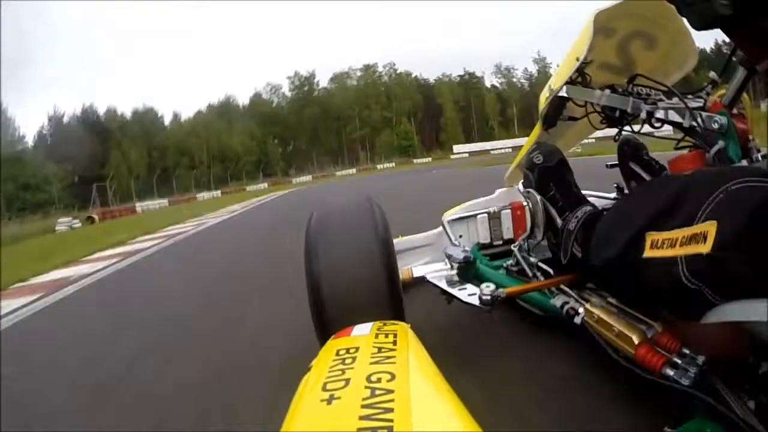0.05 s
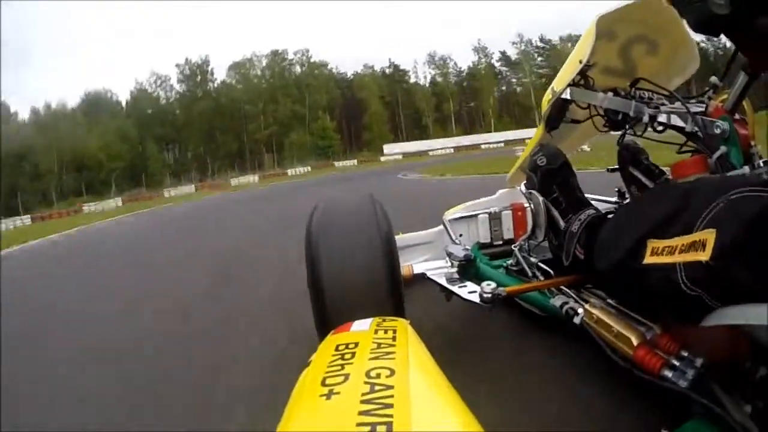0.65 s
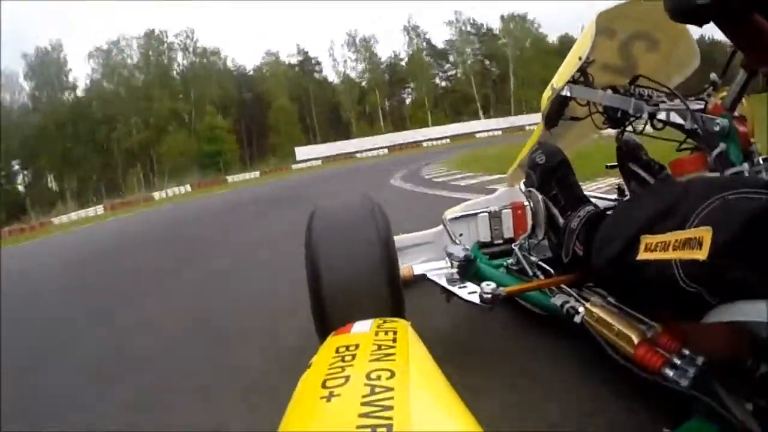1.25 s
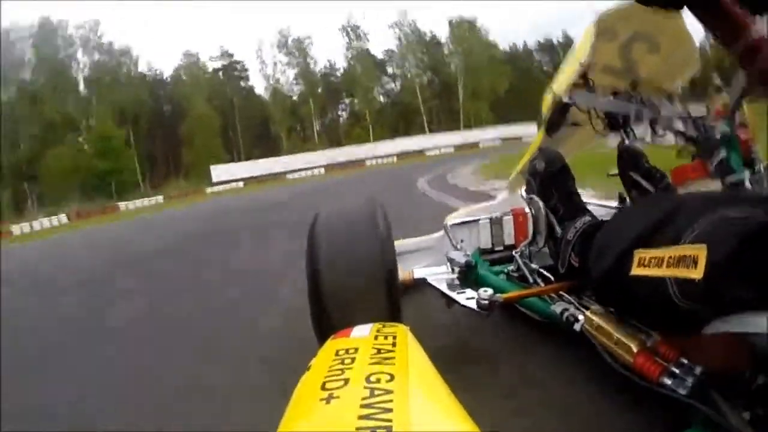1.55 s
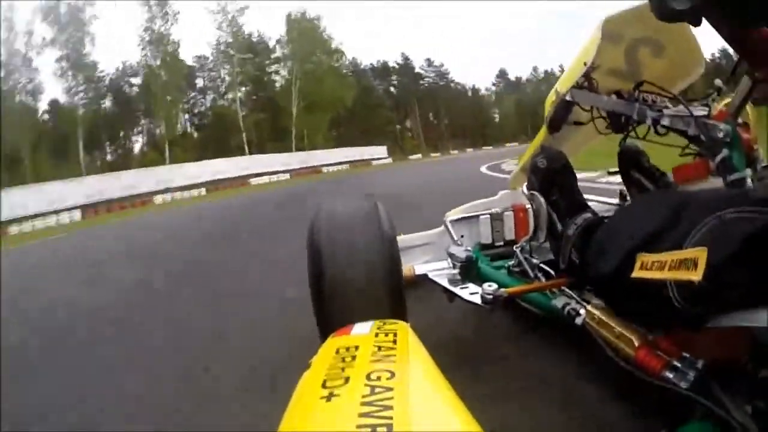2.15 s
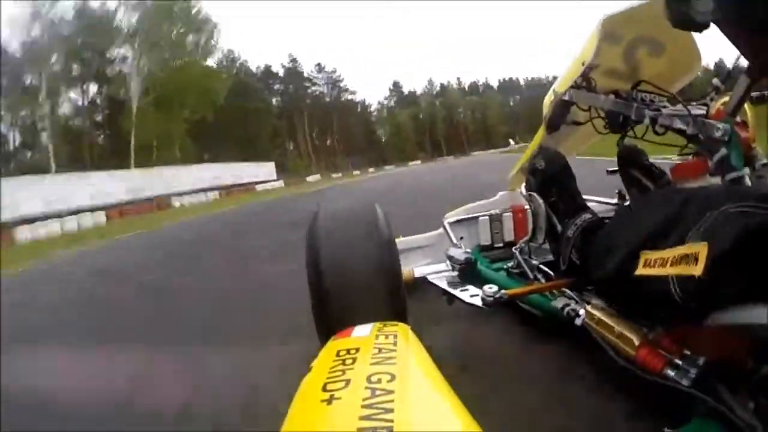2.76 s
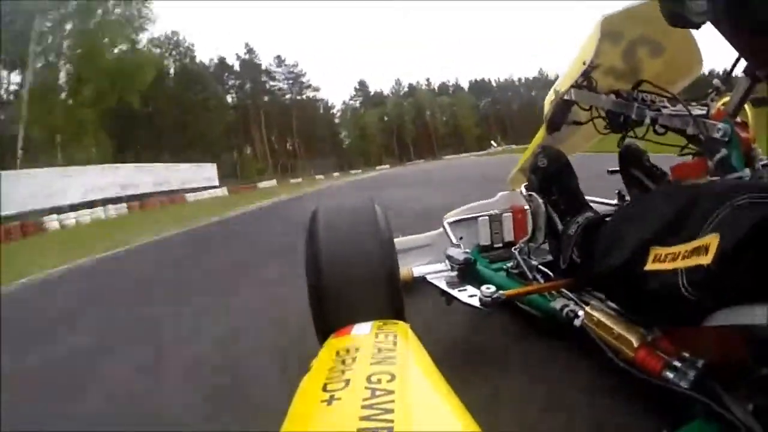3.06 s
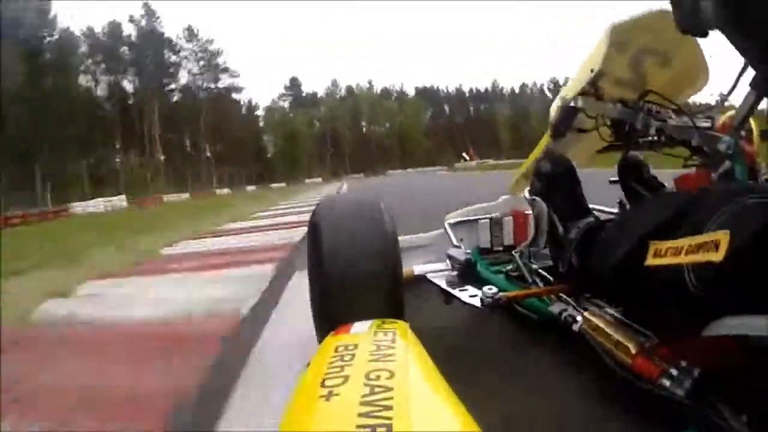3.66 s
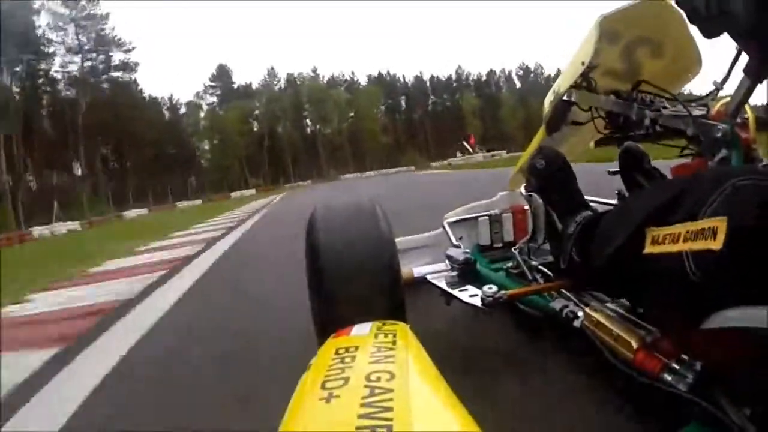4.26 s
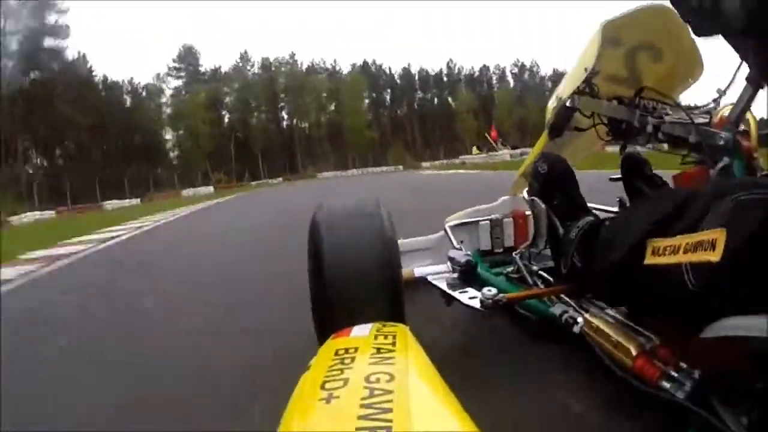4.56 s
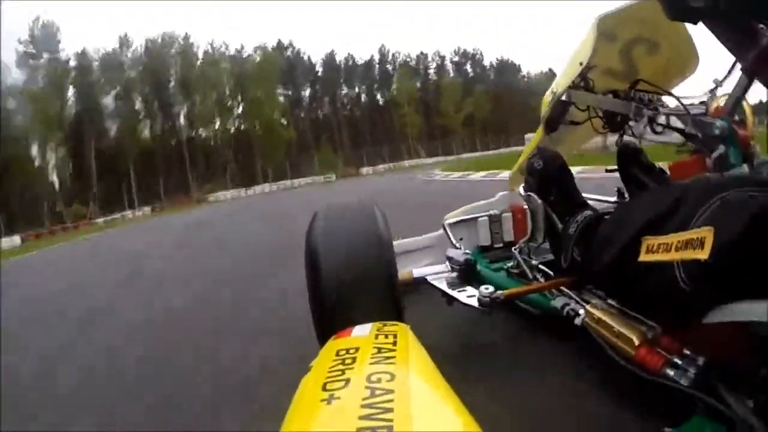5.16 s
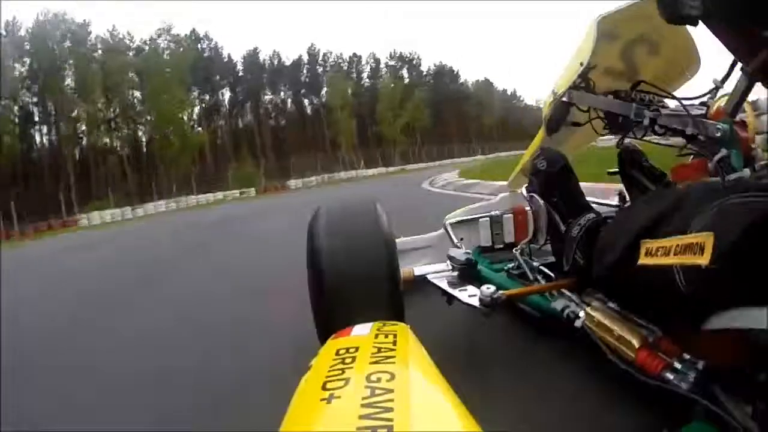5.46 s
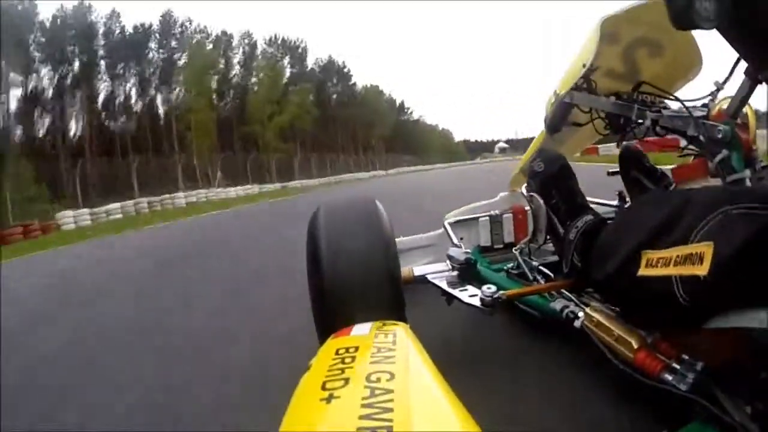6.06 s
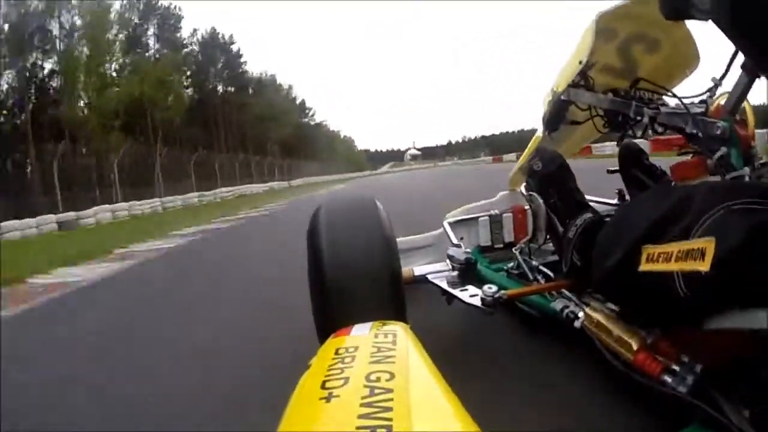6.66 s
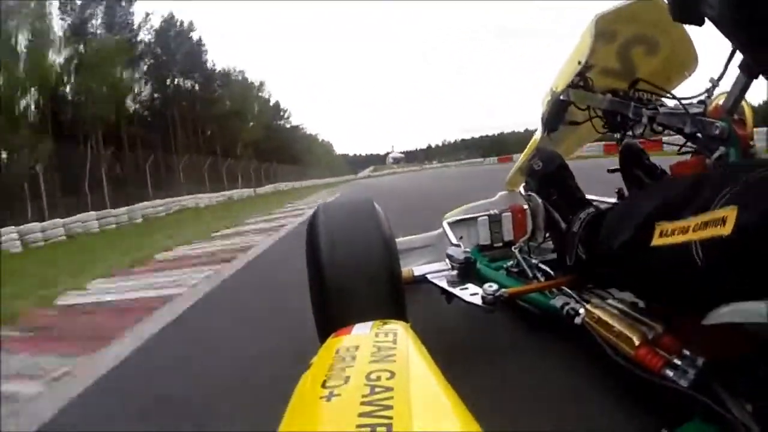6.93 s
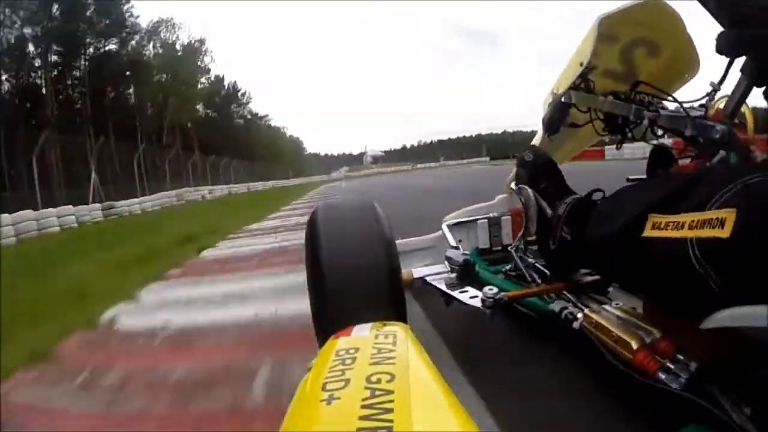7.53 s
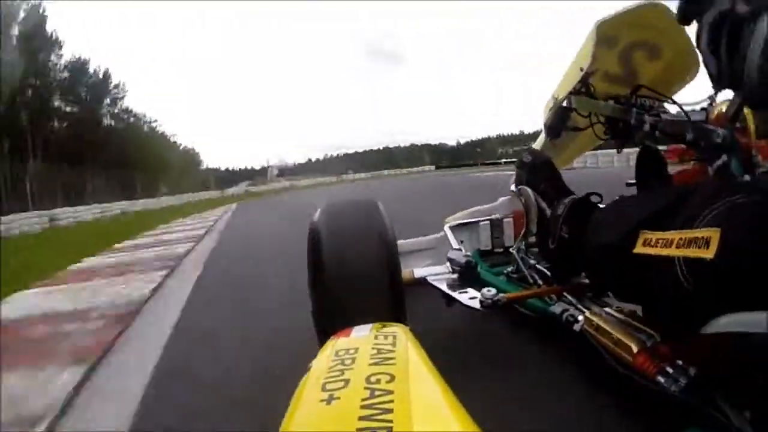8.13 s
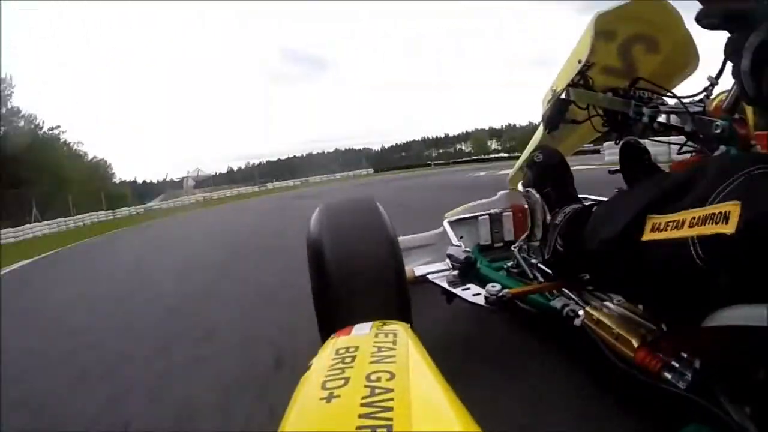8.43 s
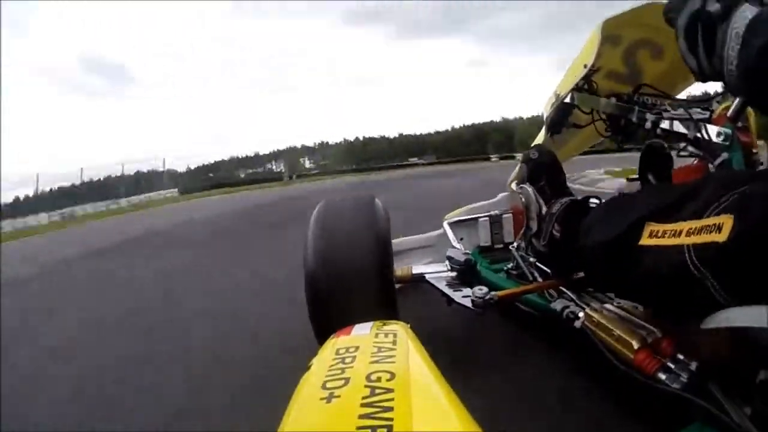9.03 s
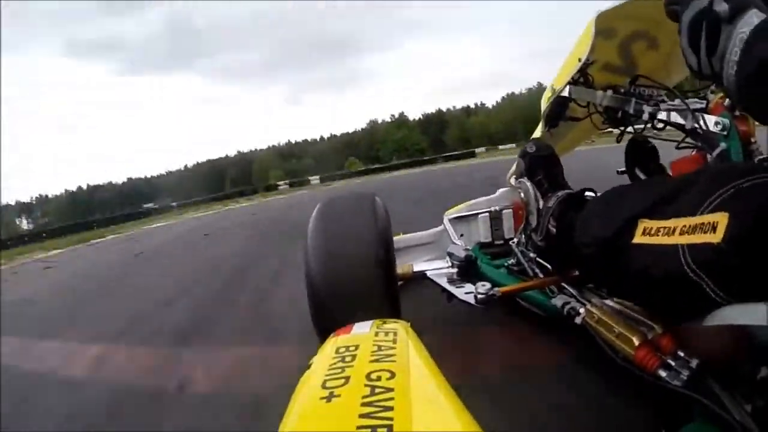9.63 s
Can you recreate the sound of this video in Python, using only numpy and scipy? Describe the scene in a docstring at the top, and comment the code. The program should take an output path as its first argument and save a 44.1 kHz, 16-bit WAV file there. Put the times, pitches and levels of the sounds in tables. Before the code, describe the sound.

A two-stroke racing kart drones near top revs on a track, heard from a microphone fixed to its side. The mount buzzes and rattles over deep chassis shudder and wind, and the kart thrums through bends and over kerbs. Late on the throttle closes, the chain whines and the pitch falls across a rough kerb. The revs pick up briefly, then sink again with another whine.

```python
"""A two-stroke racing kart, heard from a camera bolted to its side pod. From the start the engine drones
through the frame near top revs and sets the mount buzzing and rattling, over chassis shudder and wind.
The frame thrums in a bend at 1.5 s, on a kerb at 3.5 s and in a second bend at 5.5 s. At 7.5 s the
throttle closes: the chain whines and the revs sag across a rougher kerb. They pick up briefly at 8.5 s,
then the chain whines again and the engine sinks away into a last bend."""
import sys
import numpy as np
from scipy import signal
from scipy.fft import rfft, irfft, next_fast_len
from scipy.io import wavfile
from scipy.ndimage import uniform_filter1d, minimum_filter1d, map_coordinates

SR = 44100
rng = np.random.default_rng(int(sys.argv[2]) if len(sys.argv) > 2 else 0)


def transcribe(u):
    """Save the signal u as a 16-bit wav file named by the first command-line argument.

    u: samples, shape (n,) or (channels, n), limited to [-1, 1]; the rate is SR.
    q: integer samples, one column per channel.
    """
    v = np.clip(np.atleast_2d(u).T, -1, 1)
    q = np.round(v * 32767).astype(np.int16)
    wavfile.write(sys.argv[1], SR, q)


N = 431738
TIME = np.arange(N) / SR

# The bright colour of a tick on the case. Each row: frequency in Hz, level in dB.
TICK_COLOUR = [(500, -16.5), (3000, -1.5), (7000, 5), (10500, -2.5), (13300, -2), (14500, -10)]


def drone(turns, first_db, second_db):
    """The piston shakes the frame once and twice a turn."""
    first = unit(crank_order(turns, 1, flutter_db=1.3, wobble=0.14, rate=40))
    second = unit(crank_order(turns, 2, flutter_db=2.5, wobble=0.33, rate=45))
    return first * undb(first_db) + second * undb(second_db)


def frame_lift_db(hz):
    """The frame's resonances swell a crank harmonic as it slides through them."""
    # Each row: centre in Hz, width in Hz, lift in dB.
    modes = [(135.2, 35.3, 12.5), (248, 31, 15.5), (349.2, 65, 10.5)]
    return sum(lift * np.exp(-(2 * (hz - centre) / width) ** 2) for centre, width, lift in modes)


def mount(turns, shake_db, bend):
    """The mount buzzes with crank and chain, knocks at both ends of its play and scrapes in between."""
    knock_out = knocks(turns, lag=0.2867, scatter=0.0784, spread_db=2)
    knock_back = knocks(turns, lag=0.8, scatter=0.0785, spread_db=4.5)
    scrape = rng.standard_normal(N) * (1 + 0.099 * np.cos(2 * np.pi * turns))
    rattle = ring_case(unit(knock_out - knock_back) + undb(5.5) * scrape)
    rattle += buzz(turns) * undb(-4.5 + 0.32 * shake_db)
    rattle *= undb(1.2 * walk(110))  # bumps press and release the joint
    rattle /= np.sqrt(uniform_filter1d(rattle ** 2, size=2600))  # buzz and rattle share one energy
    # Harder contact gives the knocks a brighter edge.
    edge = signal.sosfiltfilt(signal.butter(6, 3250, "high", fs=SR, output="sos"), rattle)
    edge_db = -42.5 + 0.83 * shake_db + 2.33 * bend + 0.88 * walk(25)
    rattle_db = -23.5 + 0.82 * shake_db - 0.6 * bend
    return (unit(rattle - edge) + chain(turns)) * undb(rattle_db) + unit(edge) * undb(edge_db)


def buzz(turns):
    """High crank harmonics ring the mount and case."""
    # Each row: multiple of the crank speed, level in dB.
    overtones = [(8, 2), (9, -2), (10, -16), (11, 2.5), (12, -2.5), (13, -12), (14, -12), (15, -5),
                 (16, -5.5), (20, -12.5), (22, 0)]
    # The buzz also repeats every four turns. Each entry: an in-between multiple of the crank speed.
    quarter_orders = [7.5, 9.25, 9.75]
    partials = overtones + [(k, -3.5) for k in quarter_orders]
    drive = sum(undb(db) * crank_order(turns + rng.random(), k, flutter_db=3.5, wobble=0.23, rate=24)
                for k, db in partials)
    return ring_case(drive)


def ring_case(drive):
    """Mount and case ring as one body, so a tone sings out while it crosses a resonance."""
    # Their broad colour. Each row: frequency in Hz, level in dB.
    colour = [(200, -9.5), (450, -3), (850, -6.5), (1060, -9.5), (1260, -10), (1500, 0.5), (2100, 1),
              (2450, -3.5), (2980, -6.5), (3220, -18.5), (4500, -22), (6200, -25), (7200, -36.5),
              (10500, -41.5), (13300, -49.5), (15000, -63)]
    # Their resonances. Each row: centre in Hz, width in Hz, lift in dB.
    modes = [(828, 120, 5.5), (1185, 74, 8), (1366.3, 96, 13.5), (1427.4, 33.4, 6.5), (1675, 83, 0.5),
             (1808, 107, 10.5), (1956, 98, 6), (2673, 152, 7.5), (3048, 83, 6.5), (3620, 350, 8),
             (3980, 110, 5.5), (4480, 180, 6), (4910, 180, 4), (5774, 220, 7)]
    return body(drive, colour, modes)


def contact():
    """Gain of the rattle: 1, but for the instants when it breaks off."""
    # Each row: time in seconds, depth in dB.
    breaks = [(.29, -10), (1.165, -12), (3.347, -12), (3.367, -21), (3.391, -8), (3.414, -9), (3.566, -13),
              (3.592, -16), (4.781, -9), (5.041, -10), (5.308, -4), (7.873, -17)]
    return undb(sum(bump(s, half_s=0.0027, db=db) for s, db in breaks))


def chain(turns):
    """Links strike the ten sprocket teeth, harder once a turn; a shrill partner sounds a fifth above."""
    # Off throttle the wheels drive the chain and it whines.
    # Each row: start in seconds, end in seconds, rise in dB.
    lift_offs = [(7.54, 7.76, 14), (9.12, 9.33, 15)]
    mesh = crank_order(turns, 10, flutter_db=2.5, wobble=0.42, rate=50)
    partner = crank_order(turns, 15, flutter_db=3, wobble=0.6, rate=55)
    whine = (mesh + undb(-2) * partner) * (1 + 0.4 * np.cos(2 * np.pi * turns))
    return ring_case(whine) * undb(-14 + spells(lift_offs, ease_s=0.032))


def exhaust(turns, level_db):
    """The thin note of the pipe behind the seat; its harmonics slide through the pipe's resonances."""
    # Each row: frequency in Hz, level in dB.
    pipe_colour = [(330, -11), (460, 5), (560, -9), (690, -18.5), (770, -3), (910, 1), (1010, -11.5),
                   (1100, -9.5), (1230, -12), (1330, -5), (1460, 1), (1700, -21)]
    note = sum(crank_order(turns + rng.random(), k, flutter_db=3, wobble=0.4, rate=32)
               for k in range(3, 9))
    return body(note, pipe_colour) * undb(level_db)


def chatter(turns, crank_hz, level_db):
    """Something small and hard ticks unevenly on the case once a turn; the ticks stop near the end."""
    ticks = body(knocks(turns, lag=0.54, scatter=0.06, spread_db=6), TICK_COLOUR)
    gate = np.clip((crank_hz - 128.2) / 2 + 1, 0, 1)
    return ticks * gate * undb(level_db)


def hard_ticks():
    """Now and then the small, hard thing strikes the case with much more force."""
    # Each row: time in seconds, relative level in dB.
    strikes = [(3.2665, -33), (3.3159, -35), (3.3479, -37), (3.5543, -43), (3.6014, -39), (3.7838, -34),
               (4.7721, -40), (6.9395, -43), (7.424, -33), (7.855, -34)]
    s, db = np.transpose(strikes)
    ticks = body(clicks(np.round(s * SR), undb(db)), TICK_COLOUR)
    return ticks / np.abs(ticks).max() * undb(db.max() + 9.5)


def wheel_throb(turns, crank_hz):
    """An unbalanced wheel throbs once a revolution, with the square of its speed."""
    gear = 7.45  # crank turns for one turn of the wheel
    return (crank_hz / crank_hz.max()) ** 2 * np.cos(2 * np.pi * turns / gear + walk(6))


def shudder(level_db):
    """The road bounces the chassis: a deep shudder, compressed to an even level."""
    # The deep colour of the bounce. Each row: frequency in Hz, level in dB.
    colour = [(10, -36), (22, -20.5), (32, -11), (42, -4.5), (56, -1.5), (68, -15), (100, -23.5),
              (250, -44), (4000, -110)]
    # Its resonance. The row: centre in Hz, width in Hz, lift in dB.
    modes = [(45.5, 17.3, 8.5)]
    bounce = body(rng.standard_normal(N), colour, modes)
    swing = signal.hilbert(bounce, next_fast_len(N))[:N]
    power = uniform_filter1d(np.abs(swing) ** 2, size=6000)
    return unit(swing.real / np.sqrt(0.27 + power)) * undb(level_db)


def thrum(bend, kerb):
    """Bends and kerbs set the frame thrumming; a kerb also pushes the pitch up."""
    pitch_hz = 76.35 + 11 * kerb ** 2
    cycles = np.cumsum(pitch_hz) / SR
    tone = undb(2.64 * walk(20)) * np.sin(2 * np.pi * cycles + 1.76 * walk(18))
    return unit(tone) * undb(-31 + 7.6 * bend + 17 * kerb)


def buffet(level_db):
    """Wind and tyre roar beat on the case in quick gusts."""
    # Each row: frequency in Hz, level in dB.
    colour = [(60, -17.5), (110, -0.5), (150, 6), (205, 5.5), (260, 1.5), (330, -0.5), (390, -4.5),
              (470, -12), (700, -18), (1200, -19.5), (12000, -77)]
    gusts = rng.standard_normal(N) * undb(2.53 * walk(35))
    return body(gusts, colour) * undb(level_db)


def crank_order(turns, multiple, flutter_db, wobble, rate):
    """A tone at a multiple of the crank speed; uneven combustion shakes its level and phase (radians)."""
    flutter = undb(flutter_db * walk(rate))
    return np.sqrt(2) * flutter * np.sin(2 * np.pi * multiple * turns + wobble * walk(rate))


def knocks(turns, lag, scatter, spread_db):
    """One knock each crank turn, lag turns after the firing, uneven in time and force."""
    timing, force = rng.standard_normal((2000, 2)).T
    at_turn = np.arange(len(timing)) + lag + scatter * timing
    return clicks(np.interp(at_turn, turns, np.arange(N)), undb(spread_db * force))


def clicks(places, sizes):
    """Impulses at fractional sample places."""
    inside = (places > 0) & (places < N - 2)
    whole, part = np.divmod(places[inside], 1)
    whole, sizes = whole.astype(int), sizes[inside]
    return np.bincount(whole, sizes * (1 - part), N) + np.bincount(whole + 1, sizes * part, N)


def body(drive, colour, modes=()):
    """Ring a body that has a broad colour with resonant peaks on it; the result has rms 1."""
    size = 16384
    hz = np.maximum(np.arange(size // 2 + 1) * SR / size, 1)
    colour_hz, colour_db = np.transpose(colour)
    db = np.interp(np.log(hz), np.log(colour_hz), colour_db)
    for centre, width, lift in modes:
        db += lift / (1 + (2 * (hz - centre) / width) ** 2)
    cepstrum = irfft(np.log(undb(db)))[:size // 2]
    cepstrum[1:] *= 2  # minimum phase: the ring follows the strike
    response = irfft(np.exp(rfft(cepstrum, size)))
    return unit(signal.fftconvolve(drive, response)[:N])


def walk(rate):
    """A random drift of rms 1 that changes about rate times a second."""
    steps = rng.standard_normal(8192)
    return unit(map_coordinates(steps, [TIME * rate], order=1, mode="wrap"))


def spells(table, ease_s):
    """Rows of start, end and strength as one control that eases in, holds and eases out."""
    ramp = lambda s: np.clip(0.5 + (TIME - s) / ease_s, 0, 1)
    return sum(strength * (ramp(start) - ramp(end)) for start, end, strength in table)


def bump(s, half_s, db):
    """A smooth rise or dip in dB around time s, at half its size half_s to either side."""
    return db * np.cos(np.pi / 2 * np.clip((TIME - s) / (2 * half_s), -1, 1)) ** 2


def undb(db):
    """Decibels to gain."""
    return 10 ** (np.asarray(db) / 20)


def unit(x):
    """Scale to rms 1."""
    return x / np.sqrt(np.mean(x ** 2))


def scene():
    """Crank speed, shake, bends and kerbs drive the layers; all meet at one microphone in the case."""
    # The revs, one firing a turn. Each row: time in seconds, crank speed in Hz.
    revs = [(0, 184.4), (1, 184.6), (2.1, 183.5), (2.5, 178.6), (2.8, 177.1), (3.4, 183.4), (4.2, 182.7),
            (5.2, 183), (7.45, 183.5), (7.62, 181.3), (7.8, 171.9), (8, 163.1), (8.22, 142), (8.35, 140.3),
            (8.5, 150.7), (8.8, 153.4), (9.2, 137.5), (9.4, 124), (9.79, 101.8)]
    # How hard the engine shakes the mount. Each row: time in seconds, dB against steady full throttle.
    shake = [(0.0, 1.5), (1.58, 0.56), (2.01, -4.5), (2.22, 8), (2.43, 1.1), (3.25, 0.6), (3.42, -6.5),
             (3.81, 2.1), (4.34, 4), (4.52, -0.1), (5.7, 0.6), (6.29, 2), (7.77, 0.3), (7.89, -8),
             (8.43, -9), (8.56, 6), (9.09, -9.5), (9.55, -6), (9.79, -9)]
    # Brief dips and swells of the shake. Each row: centre in seconds, half width in seconds, change in dB.
    lulls = [(0.27, 0.065, -6), (0.46, 0.039, -8), (0.835, 0.094, -5), (1.212, 0.05, -4.5),
             (1.712, 0.042, -7), (3.386, 0.027, -7.5), (3.596, 0.049, -7), (4.801, 0.058, -6.5),
             (5.068, 0.032, -4.5), (5.326, 0.025, -5), (5.89, 0.048, -7), (9.688, 0.08, -5.5)]
    surges = [(0.117, 0.024, 4.5), (1.099, .04, 3.5), (3.05, 0.054, 4), (4.97, .04, 3), (8.198, 0.03, 3.5),
              (8.833, .08, 2)]
    # Bends load the frame sideways. Each row: start in seconds, end in seconds, load.
    bends = [(1.45, 3.3, 1), (5.45, 6.85, 0.77), (8.7, 10.2, 1.12)]
    # Rides over the kerb. Each row: start in seconds, end in seconds, roughness.
    kerbs = [(3.5, 4.25, .33), (7.74, 8.18, 0.796)]
    crank_hz = np.interp(TIME, *np.transpose(revs))
    turns = np.cumsum(crank_hz) / SR
    bend, kerb = spells(bends, ease_s=0.4), spells(kerbs, ease_s=0.2)
    lull_db = sum(bump(*row) for row in lulls)
    shake_db = np.interp(TIME, *np.transpose(shake)) + lull_db + sum(bump(*row) for row in surges)
    swell_db = 0.72 * shake_db - 0.51 * bend + frame_lift_db(crank_hz)  # of the drone's fundamental
    second_db = -37.5 + 1.14 * shake_db + 2.2 * bend + frame_lift_db(2 * crank_hz) + 0.28 * lull_db

    throb = wheel_throb(turns, crank_hz)
    engine = drone(turns, first_db=-20.5 + swell_db, second_db=second_db)
    engine *= 1 + 0.28 * throb  # the wheel rocks the engine's load on the frame
    engine += exhaust(turns, level_db=-40 + 0.6 * shake_db + 3.3 * bend)
    ticks = chatter(turns, crank_hz, level_db=-62 + 0.78 * swell_db + 5.6 * kerb)
    waver_db = 1.22 * walk(22)  # the road makes the rattle waver
    rattle = contact() * (mount(turns, shake_db + waver_db, bend) + ticks) + hard_ticks()
    # Shudder and wind recede as the drone swells.
    road = undb(-28) * throb + shudder(level_db=-17 - 0.35 * swell_db) + thrum(bend, kerb)
    wind = buffet(level_db=-27 + 1.95 * bend + 5.8 * kerb - 0.067 * swell_db)
    return (engine + rattle + road + wind)[None]


def record(dry):
    """A look-ahead limiter holds the peaks down; the top is cut."""
    ceiling, window_samples, top_hz = 0.76, 900, 15400
    gain = minimum_filter1d(ceiling / np.maximum(np.abs(dry), ceiling), size=window_samples)
    limited = dry * uniform_filter1d(gain, size=window_samples)
    return signal.sosfilt(signal.ellip(8, 0.2, 70, top_hz, fs=SR, output="sos"), limited)


dry = scene()
out = record(dry)
transcribe(out)
```